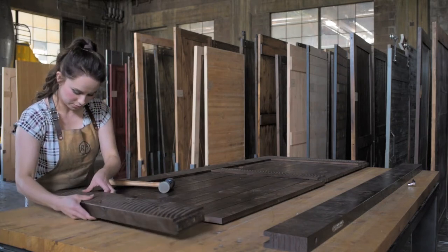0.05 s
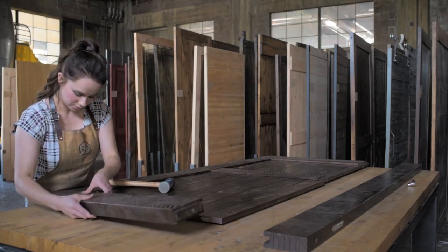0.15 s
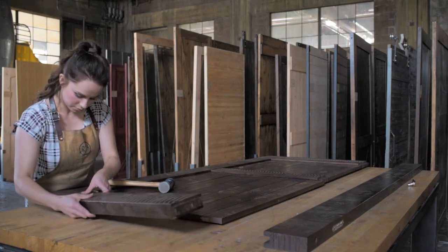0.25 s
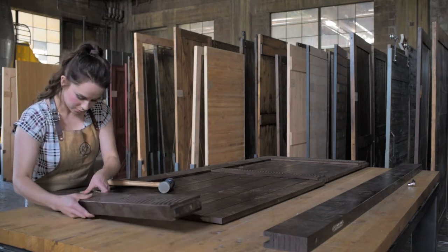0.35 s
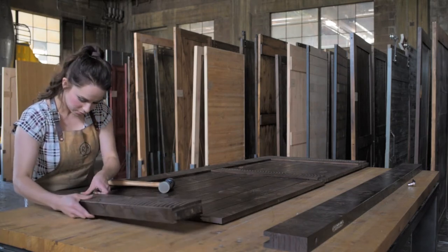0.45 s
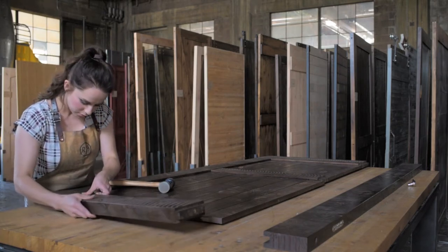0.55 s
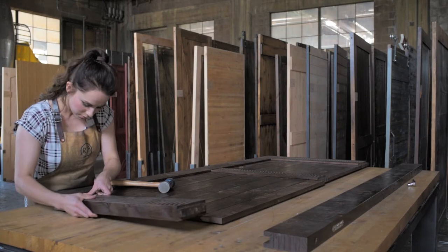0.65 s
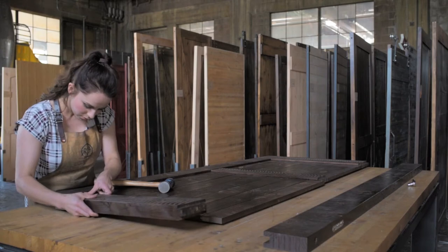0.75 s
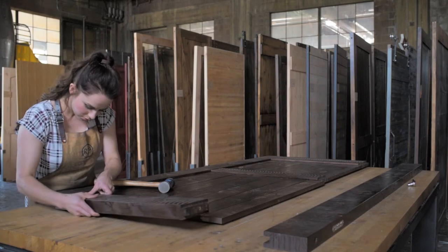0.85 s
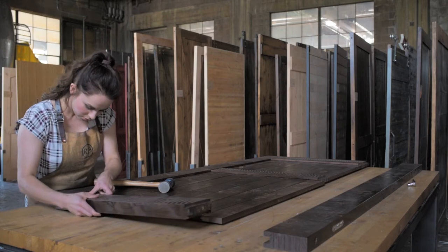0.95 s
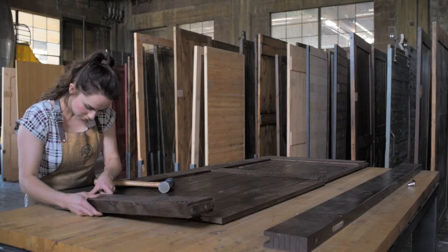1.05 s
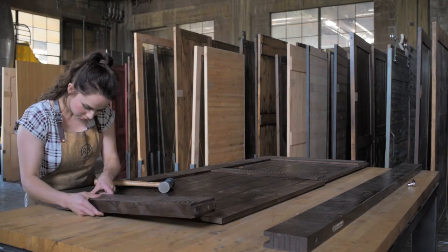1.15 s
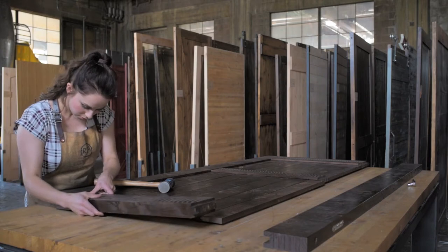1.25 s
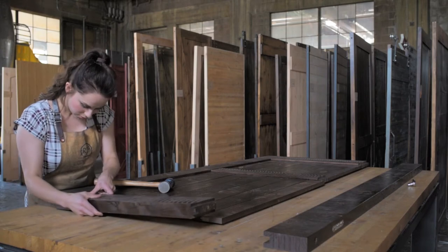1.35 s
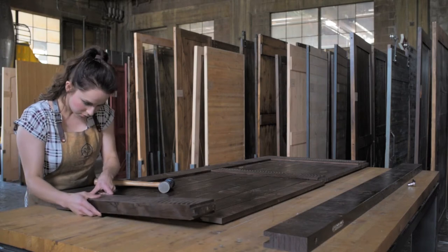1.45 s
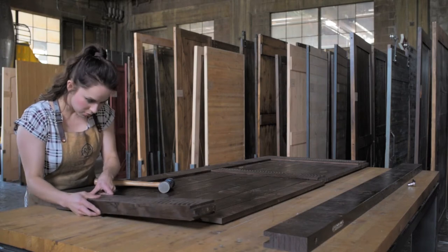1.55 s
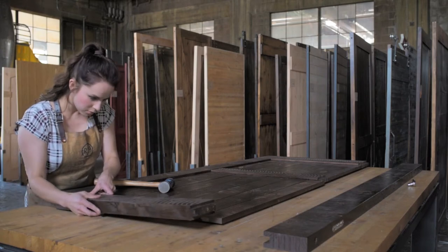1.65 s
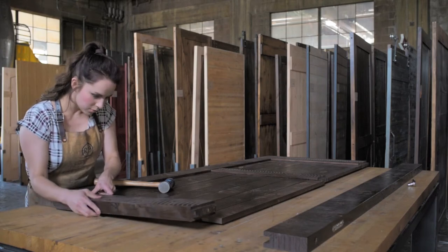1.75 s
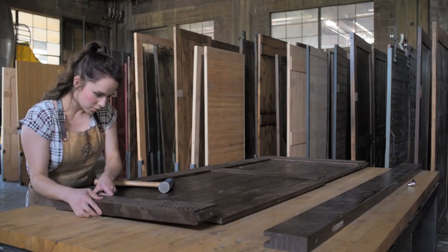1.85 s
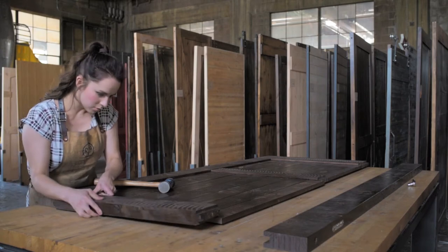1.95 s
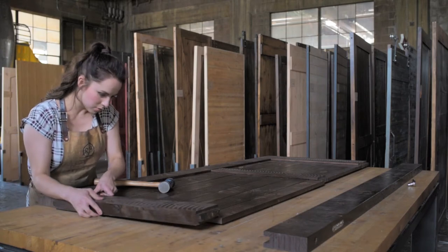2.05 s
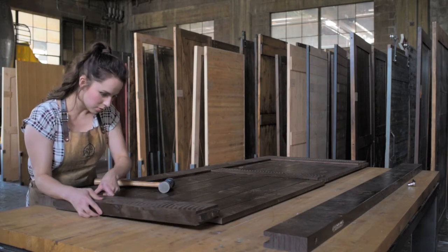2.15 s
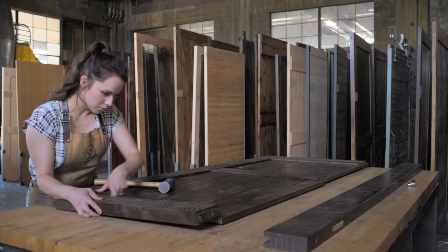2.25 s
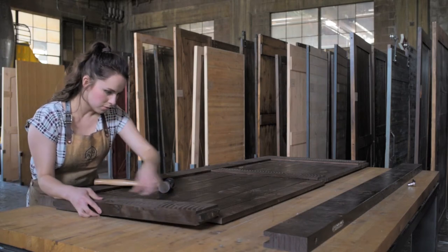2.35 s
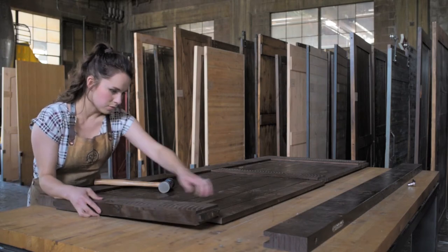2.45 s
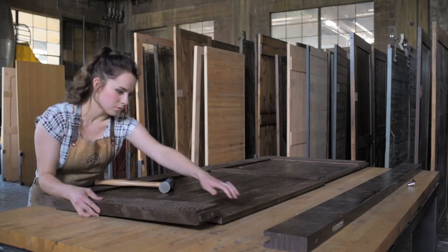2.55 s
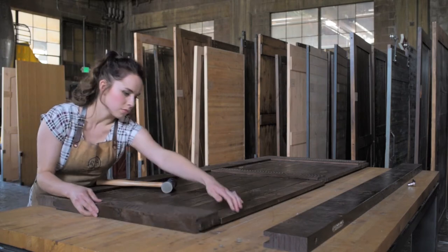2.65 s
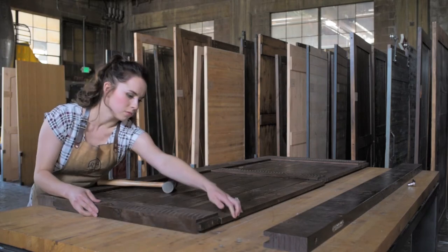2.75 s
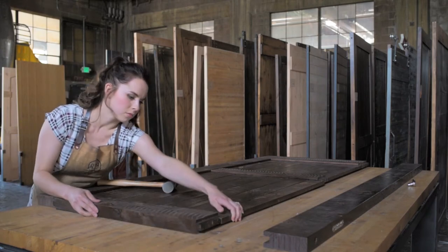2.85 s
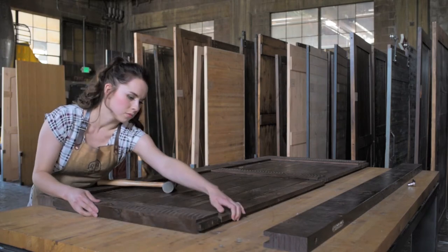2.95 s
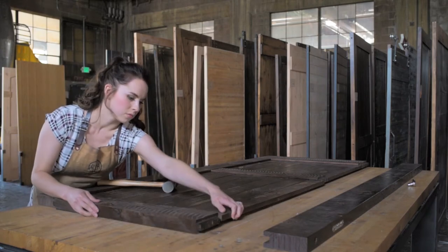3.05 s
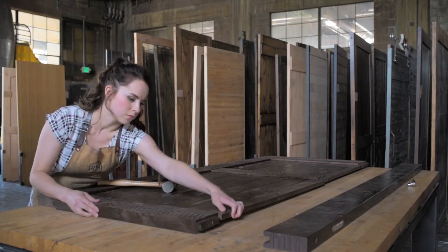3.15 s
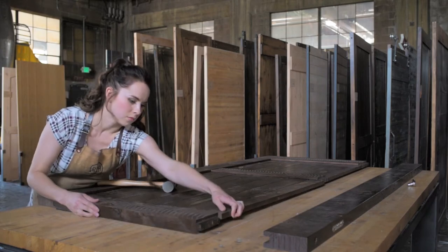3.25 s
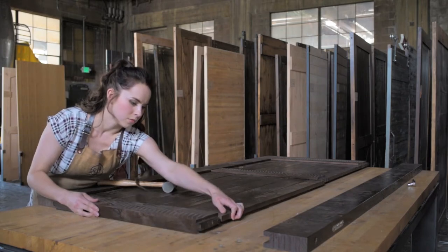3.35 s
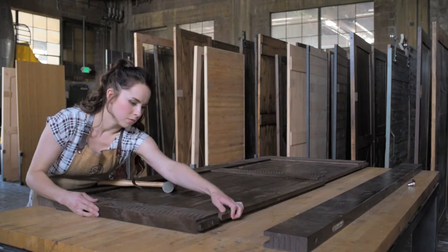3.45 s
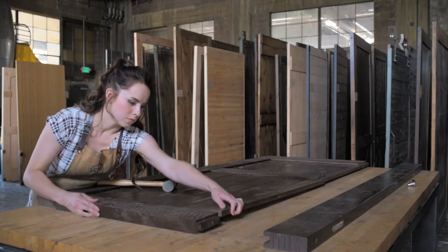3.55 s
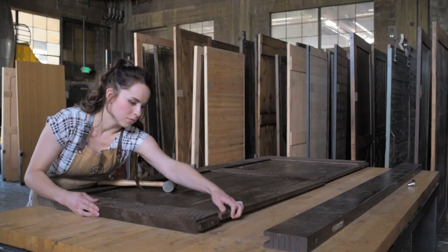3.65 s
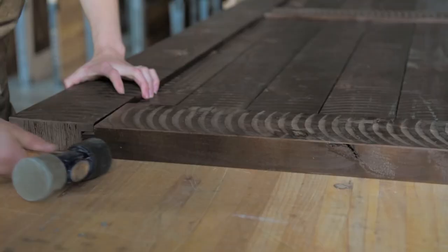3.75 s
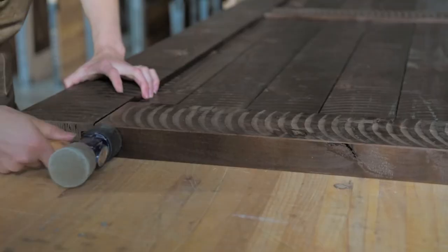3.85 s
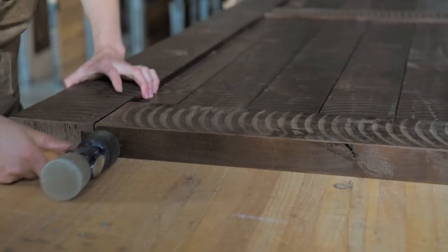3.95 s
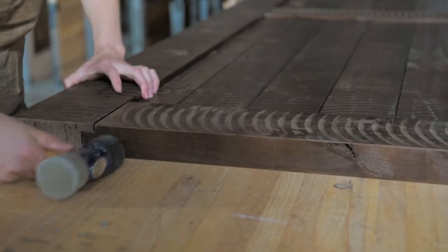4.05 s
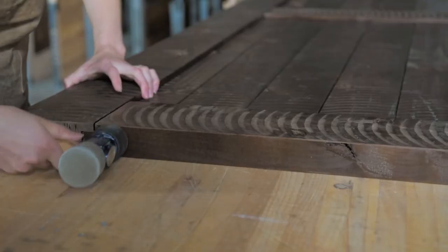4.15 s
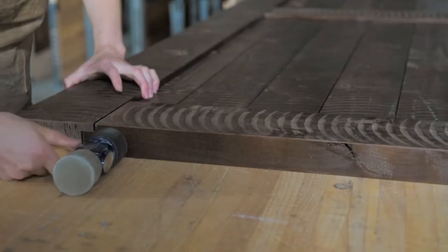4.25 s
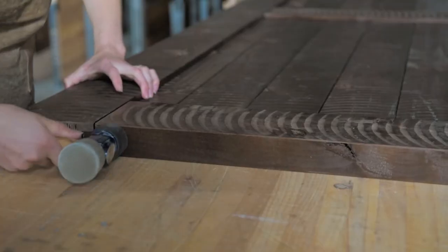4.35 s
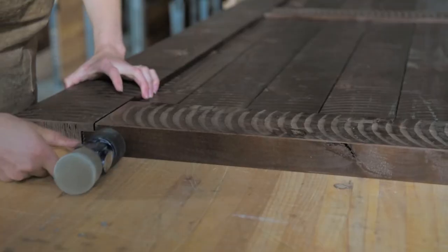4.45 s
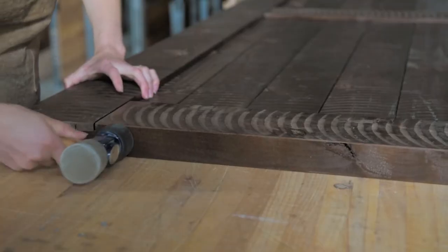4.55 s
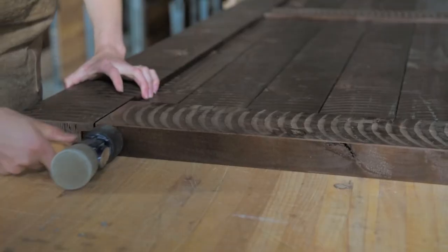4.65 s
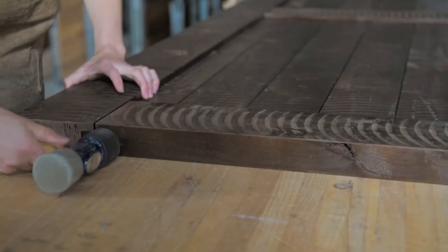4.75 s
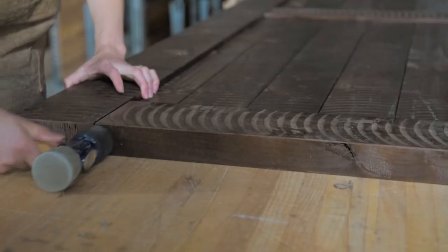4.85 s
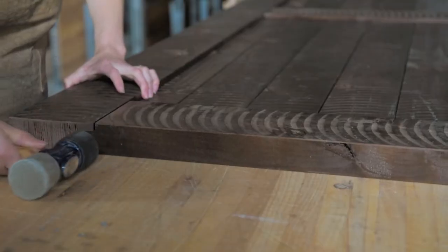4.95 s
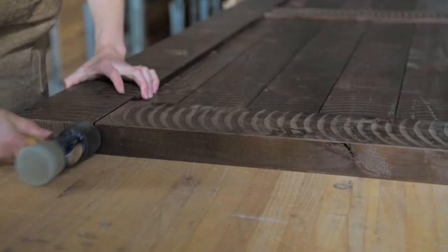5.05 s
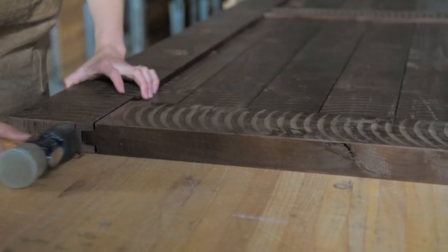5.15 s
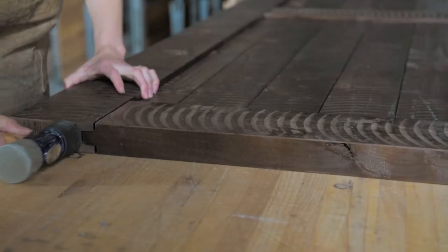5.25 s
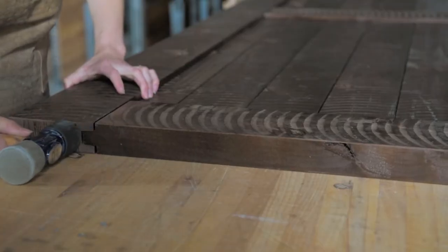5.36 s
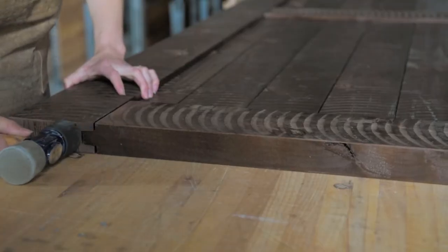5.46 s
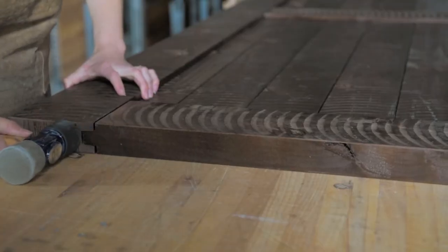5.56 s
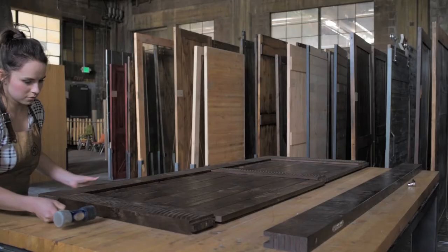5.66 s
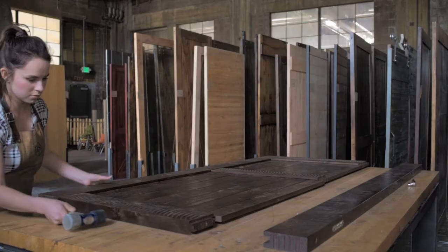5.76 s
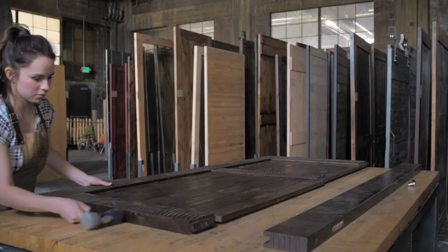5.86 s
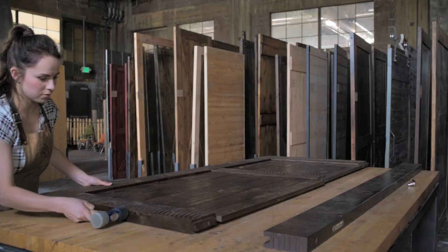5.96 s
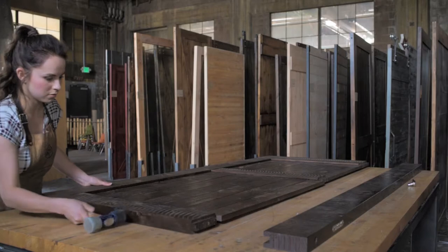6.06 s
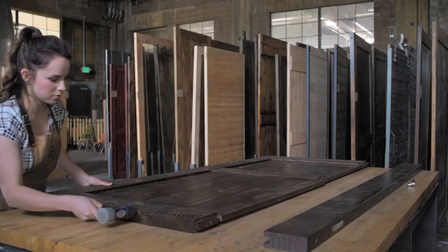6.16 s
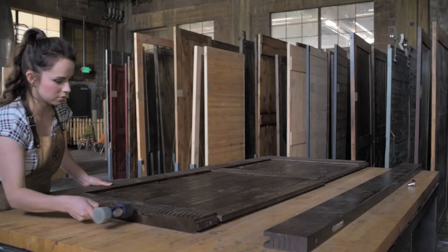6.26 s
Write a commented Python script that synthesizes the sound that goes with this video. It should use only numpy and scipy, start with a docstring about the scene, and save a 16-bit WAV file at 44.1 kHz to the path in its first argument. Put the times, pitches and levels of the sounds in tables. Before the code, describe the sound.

A loose wooden rail bumps softly on a workbench, knocks once, then butts against a door panel with a sharp clack. After a brief shuffle of wood, a rubber mallet strikes the panel's edge six times in a quick, even run. A short pause follows, then a duller tap and a heavy final thud. The knocks sound fairly close, with a dull echo in a large workshop and faint ventilation behind.

```python
"""A faint wash of room sound dies away over a low hum of ventilation. A loose wooden rail bumps along a
workbench, then butts hard against a door panel; each contact sets its bending modes ringing. A rubber
mallet seats the joint: at each blow the tenon rasps for a few milliseconds, then the panel thuds.
The large workshop answers with a long, dull reverberant tail."""
import sys
import numpy as np
from scipy import signal
from scipy.fft import rfft, irfft, next_fast_len
from scipy.io import wavfile
from scipy.ndimage import uniform_filter1d, minimum_filter1d

SR = 44100
rng = np.random.default_rng(int(sys.argv[2]) if len(sys.argv) > 2 else 0)


def log_audio(samples):
    """Write samples as a 16-bit WAV file to the path given in sys.argv[1]."""
    # one column per channel
    frames = np.atleast_2d(samples).T
    # limit to full scale, then quantise
    limited = np.clip(frames, -1, 1)
    pcm = np.round(limited * 32767).astype(np.int16)
    wavfile.write(sys.argv[1], SR, pcm)


N = 278222
TIME = np.arange(N) / SR
HIT_TIME = TIME[:SR // 3]   # time axis of one impact [s]
EDGES_HZ = 22 * 2 ** np.arange(0, 9.9, 1 / 3)   # third-octave bands
CENTRES_HZ = np.sqrt(EDGES_HZ[1:] * EDGES_HZ[:-1])
BANK = [signal.butter(2, edges, "band", fs=SR, output="sos") for edges in zip(EDGES_HZ, EDGES_HZ[1:])]
# rail striking bench and panel: (time [s], strength [dB], contact cut-off [Hz], pitch [ratio])
RAIL_KNOCKS = [(.488, -29.5, 189, 0.35), (0.715, -22.5, 500, .63), (.742, -31.5, 336, 1.04),
               (1.114, -42, 200, 0.55), (1.9948, -13, 570, .95), (2.7583, 1, 3060, .97)]


def from_db(db):
    """Decibels to amplitude ratio."""
    return 10 ** (np.asarray(db) / 20)


def at_hz(table, hz, column=1):
    """Interpolation of a table column on a log-frequency axis."""
    table = np.array(table)
    return np.interp(np.log(hz), np.log(table[:, 0]), table[:, column])


def fade(t, t60):
    """Exponential decay, 60 dB down after t60 seconds."""
    return np.exp(-np.log(1000) * t / max(t60, 1e-3))


def swell(s, half_s):
    """Gaussian envelope centred on time s."""
    return np.exp(-np.minimum(((TIME - s) / half_s) ** 2, 50))


def cut(x, hz, kind, order=2):
    """Butterworth low- or high-pass filter."""
    return signal.sosfilt(signal.butter(order, min(hz, SR / 2 - 1), kind, fs=SR, output="sos"), x)


def add(out, s, sound):
    """Superposition of a sound starting at time s."""
    i = round(s * SR)
    out[i:i + len(sound)] += sound[:N - i]


def noise_bands(size, count=1):
    """Third-octave bands of steady white noise; adjacent bands are uncorrelated."""
    white = rng.standard_normal((count, 2, size + len(HIT_TIME)))
    for k, (hz, sos) in enumerate(zip(CENTRES_HZ, BANK)):
        yield hz, signal.sosfilt(sos, white[:, k % 2])[:, -size:]


def coloured(spectrum):
    """Spectral shaping of steady noise, scaled to unit rms."""
    size = next_fast_len(N)
    hz = np.maximum(np.fft.rfftfreq(size, 1 / SR), 1)
    noise = irfft(rfft(rng.standard_normal(size)) * from_db(at_hz(spectrum, hz)), size)[:N]
    return noise / noise.std()


def burst(noise, s, t60, hold_s=0):
    """A transient cut from steady noise at time s: held, then decaying exponentially."""
    return np.roll(noise, -round(s * SR))[:len(HIT_TIME)] * fade(np.maximum(HIT_TIME - hold_s, 0), t60)


def dense_rings(table, count, build_s):
    """Modal overlap: crowded modes merge into noise, each band with its own decay; one row per impact."""
    decaying = sum(band * from_db(at_hz(table, hz)) * fade(HIT_TIME, at_hz(table, hz, column=2))
                   for hz, band in noise_bands(len(HIT_TIME), count))
    return decaying * (1 - np.exp(-HIT_TIME / build_s))


def modal_ring(modes, pitch, scatter_db, travel_s=0):
    """Free vibration of a board: damped sinusoids, weighted differently at each contact point."""
    out, top_hz = 0, modes[-1][0]
    shares = from_db(scatter_db * rng.standard_normal(len(modes)))
    for share, (hz, db, t60) in zip(shares, modes):
        # bending waves are dispersive: low frequencies travel more slowly and arrive later
        age = np.maximum(HIT_TIME - travel_s * (np.sqrt(top_hz / hz) - 1), 0)
        out = out + share * from_db(db) * np.sin(2 * np.pi * hz * pitch * age) * fade(age, t60)
    return out


def ventilation(air_db=-52.5):
    """Steady broadband noise of moving air, with low pure tones that swell and fade."""
    # air noise: (frequency [Hz], relative spectral level [dB])
    air_spectrum = [(25, -9), (45, -9), (80, -6.5), (125, 1), (190, -5.5), (260, -3), (400, -13),
                    (700, -15.5), (1250, -18.5), (2000, -22.5), (4500, -33), (8000, -48), (12500, -50),
                    (16000, -51)]
    # hums: (centre time [s], half length [s], frequency [Hz], level [dB])
    hum_swells = [(0.078, 0.2, 121, -44.5), (1.38, .16, 76.7, -51.5), (1.71, 0.096, 78, -53.5)]
    hums = sum(from_db(db) * swell(s, half_s) * np.sin(2 * np.pi * hz * TIME)
               for s, half_s, hz, db in hum_swells)
    return from_db(air_db) * coloured(air_spectrum) + hums


def reverberation(x, wet_db=-13, build_s=0.005):
    """Energy balance of a diffuse field: in each band the room stores sound energy and leaks it away."""
    # room response: (frequency [Hz], relative level [dB], reverberation time [s])
    room_bands = [(30, -10.5, 1), (70, -1.5, 0.7), (130, 1.5, 1.3), (280, -2, 1.56), (710, -0.5, 1.41),
                  (1300, -2, 1.43), (2300, -5.5, .85), (4950, -6, .35), (12000, -10, .2)]
    out, fill = np.zeros(N), np.exp(-1 / (build_s * SR))
    for sos, (hz, (noise,)) in zip(BANK, noise_bands(N)):
        retained = fade(2 / SR, at_hz(room_bands, hz, column=2))   # share of energy left after a sample
        power = signal.sosfilt(sos, x + 1e-9 * noise) ** 2
        arriving = signal.lfilter([1 - fill], [1, -fill], power)
        stored = signal.lfilter([1 - retained], [1, -retained], arriving)
        out += from_db(wet_db + at_hz(room_bands, hz)) * np.sqrt(stored) * noise / noise.std()
    return out


def slides_and_swells(hiss_db=-22, catch_db=5.0, echo_db=-40, echo_after_s=0.16):
    """Sliding friction: boards groan and hiss unevenly; the same low noise gives room swells and a thud."""
    # a wash of room sound at the start, groans of shifting boards and, at 3.758 s, the soft thud
    # of the mallet set against the panel: (centre time [s], half length [s], level [dB])
    low_swells = [(0.125, 0.13, -57), (3.609, .053, -39.5), (3.727, 0.024, -37), (3.758, 0.0072, -29),
                  (6.038, 0.038, -37.5)]
    # a light brush over the wood only hisses: (centre time [s], half length [s], level [dB])
    brushes = [(0.83, 0.04, -64), (2.733, 0.02, -46), (4.35, 0.058, -59.5), (4.587, 0.031, -58.5)]
    # the two noises: (frequency [Hz], relative spectral level [dB])
    low_spectrum = [(25, -28), (90, -8), (200, -0.5), (310, 6), (380, 2), (460, 1), (700, -12.5),
                    (1200, -17.5), (3000, -37), (12000, -70)]
    hiss_spectrum = [(200, 11), (1500, 6.5), (3500, 0.5), (7000, -15), (11000, -25.5), (16000, -25)]
    catches = cut(rng.standard_normal(N), 120, "low")
    flutter = from_db(catch_db * catches / catches.std())
    low = sum(from_db(db) * swell(s, half_s) for s, half_s, db in low_swells)
    hiss = from_db(hiss_db) * low + sum(from_db(db) * swell(s, half_s) for s, half_s, db in brushes)
    # a low room echo swells shortly after the hardest knock
    knock_s, knock_db, *_ = max(RAIL_KNOCKS, key=lambda row: row[1])
    echo = from_db(knock_db + echo_db) * swell(knock_s + echo_after_s, half_s=0.065)
    return (low + echo) * coloured(low_spectrum) + hiss * coloured(hiss_spectrum) * flutter


def rail_knocks(dense_db=8, clack_db=-17, clack_t60=0.03, crisp_hz=380, radiate_hz=100):
    """Impact of wood on wood: a clack and ringing modes; a longer contact excites less treble."""
    # the rail's distinct modes: (frequency [Hz], relative level [dB], decay time t60 [s])
    rail_modes = [(101, -19.5, 0.059), (173, -27.5, 0.11), (274, -11.5, 0.091), (420.6, -15, 0.097),
                  (447.7, -10.5, 0.084), (497, -19, 0.16), (569, -10, 0.077), (676, -26, 0.036),
                  (788, -13.5, 0.051), (1044, -22, 0.051), (1128, -25, 0.06), (1384, -15, 0.04),
                  (1446, -17.5, 0.028), (1590, -33, 0.036), (2090, -16.5, 0.024), (2360, -16, 0.017)]
    # crowded modes and near reflections: (frequency [Hz], relative level [dB], decay time t60 [s])
    dense_bands = [(60.4, -40, 0.075), (250, -11.5, 0.084), (490, -5, 0.12), (1090, -6, 0.098),
                   (2060, -30, 0.024), (4040, -61, 0.046), (12000, -64, .03)]
    # contact noise: (frequency [Hz], relative spectral level [dB])
    clack_spectrum = [(150, -10), (500, -6), (800, -7), (1080, 17), (1350, -15), (1650, 7.5), (2000, 3),
                      (2350, 4), (2800, -6.5), (3250, -3), (4500, -6.5), (7000, -19.5), (16000, -20)]
    # light clicks, the last as the mallet is set against the panel: (time [s], level [dB])
    ticks = [(0.469, -54), (0.7138, -47.5), (3.575, -48.5), (3.628, -47), (3.7442, -38.5)]
    out, grit = np.zeros(N), coloured(clack_spectrum)
    rings = from_db(dense_db) * dense_rings(dense_bands, len(RAIL_KNOCKS), build_s=0.0025)
    for (s, db, contact_hz, pitch), dense in zip(RAIL_KNOCKS, rings):
        body = modal_ring(rail_modes, pitch, scatter_db=-4.0, travel_s=0.00088) + dense
        knock = cut(body, contact_hz, "low", order=3)
        add(out, s, from_db(db) * cut(knock, radiate_hz, "high"))
        crispness = 1 / (1 + (crisp_hz / contact_hz) ** 6)   # a soft contact hardly clacks
        clack = cut(burst(grit, s, clack_t60), 2450, "low")
        add(out, s, crispness * from_db(db + clack_db) * clack)
    for s, db in ticks:
        add(out, s, from_db(db) * cut(burst(grit, s, clack_t60), 9000, "low"))
    return out


def seating_blow(jerk_s=0.0079, rise_db=6, rise_ratio=1.15, bounce_s=0.024, bounce_loss_db=10):
    """Stick-slip: the tenon goes home in three jerks, each louder and higher; the head bounces once."""
    # the final thud: (time [s], strength [dB], pitch [ratio], slip level [dB])
    final_thud = (6.2382, 1.8, 1.26, -26)
    s, db, pitch, slip_db = final_thud
    jerks = [(s - k * jerk_s, db - k * rise_db, pitch / rise_ratio ** k, slip_db) for k in range(3)]
    bounce = (s + bounce_s, db - bounce_loss_db, 1.06, -np.inf)   # a seated joint slips no more
    return jerks + [bounce]


def mallet_blows(slip_s=0.004, slip_t60=0.015, radiate_hz=165):
    """Momentum transfer: the tenon rasps into its groove, stops, and passes the push to the panel."""
    # blows on the panel edge: (time of thud [s], strength [dB], pitch [ratio], slip level [dB])
    near_blows = [(4.0140, -12.5, 0.93, -29.5), (4.2830, -5, 1.066, -25.5), (4.5290, -3.5, 1.013, -25.5),
                  (4.7912, -4.5, 1.086, -22.5), (5.0362, -1.3, .99, -28), (5.2926, -1.5, 0.96, -25),
                  (5.9799, -7.5, 0.72, -30)]
    # the panel's distinct modes: (frequency [Hz], relative level [dB], decay time t60 [s])
    panel_modes = [(109, -47, 0.3), (139, -51, 0.14), (202, -39, 0.063), (266.8, -17, 0.16),
                   (297.8, -9, 0.052), (288.4, -32.5, 0.14), (331.4, -16.5, 0.081), (441.7, -22, 0.18),
                   (514, -47, 0.11), (551, -33.5, 0.16), (590, -41, 0.12), (783, -26, 0.1),
                   (847, -35, 0.16), (968, -37, 0.23), (1076, -30.5, 0.042), (1097, -23.5, 0.079),
                   (1246, -35, 0.052), (1320, -29, 0.019), (2700, -23.5, 0.026)]
    # crowded modes and near reflections: (frequency [Hz], relative level [dB], decay time t60 [s])
    dense_bands = [(60, -21, 0.29), (130, -18, 0.21), (288, -17.5, 0.13), (487, -13, 0.12),
                   (616, -27.5, 0.07), (977, -18.5, 0.088), (1560, -25.5, 0.074), (4000, -30.5, 0.055),
                   (11800, -34.5, 0.025)]
    # friction of the tenon: (frequency [Hz], relative spectral level [dB])
    slip_spectrum = [(150, -17.5), (400, 16.5), (1000, 13), (1450, -2), (1780, 7.5), (2200, -1), (2600, 4),
                     (3000, -3.5), (3600, -2), (4500, -7), (5300, -10), (7000, -14), (11000, -22.5),
                     (16000, -35)]
    # tone of the blows: (thud cut-off [Hz], slip cut-off [Hz], dense ring gain [dB])
    near_bright, far_dull = (1176, 11200, 17.6), (880, 3500, 13.4)
    blows = [(*row, *near_bright) for row in near_blows] + [(*row, *far_dull) for row in seating_blow()]
    out, grit = np.zeros(N), coloured(slip_spectrum)
    rings = dense_rings(dense_bands, len(blows), build_s=0.0067)
    for (s, db, pitch, slip_db, thud_hz, slip_hz, dense_db), dense in zip(blows, rings):
        body = from_db(dense_db) * dense - modal_ring(panel_modes, pitch, scatter_db=3.0)
        thud = cut(body, thud_hz, "low")
        # acoustic short circuit: air slips round the panel's edges, so little bass is radiated
        add(out, s, from_db(db) * cut(thud, radiate_hz, "high"))
        rasp = burst(grit, s, slip_t60, hold_s=slip_s + 0.00065)
        add(out, s - slip_s, from_db(slip_db) * cut(rasp, slip_hz, "low", order=1))
    return out


def scene():
    """Superposition of the work at the bench, its reverberation and the ventilation."""
    bench = rail_knocks() + mallet_blows() + slides_and_swells()
    return (bench + reverberation(bench) + ventilation())[None]


def record(dry, ceiling=0.98, low_cut_hz=45, high_cut_hz=16000):
    """Look-ahead limiting eases the loudest peaks; band limiting removes rumble and the extreme treble."""
    safe_gain = minimum_filter1d(ceiling / np.maximum(np.abs(dry), ceiling), size=67)
    smooth_gain = uniform_filter1d(uniform_filter1d(safe_gain, size=33), size=33)
    limited = cut(smooth_gain * dry, low_cut_hz, "high")
    return signal.sosfilt(signal.ellip(10, .1, 80, high_cut_hz, fs=SR, output="sos"), limited)


dry = scene()
out = record(dry)
log_audio(out)
```